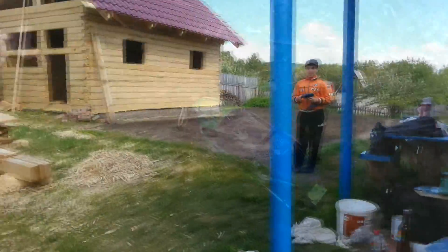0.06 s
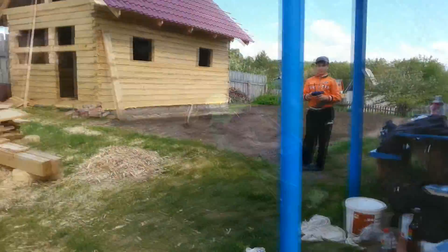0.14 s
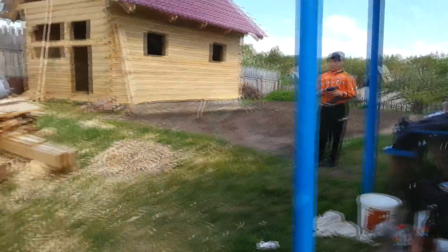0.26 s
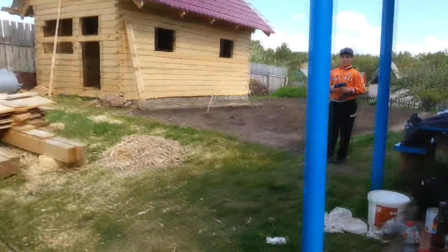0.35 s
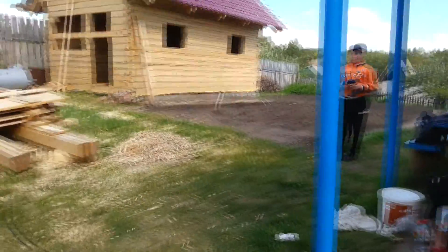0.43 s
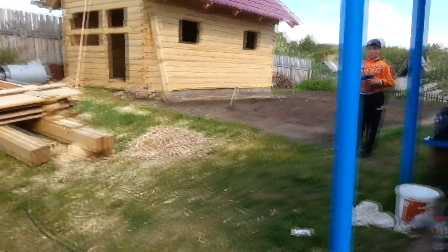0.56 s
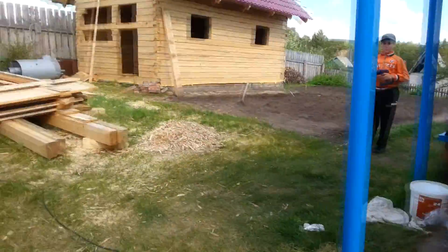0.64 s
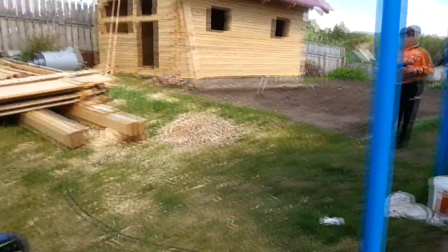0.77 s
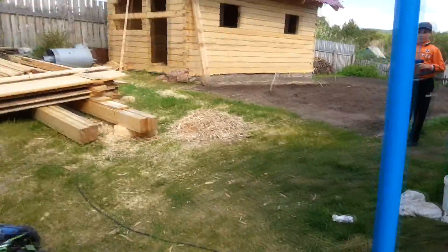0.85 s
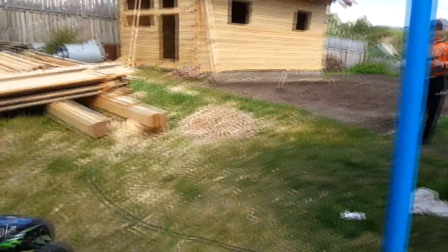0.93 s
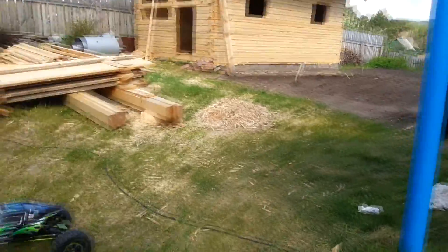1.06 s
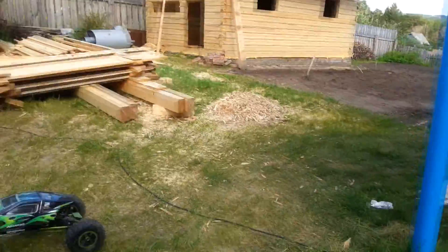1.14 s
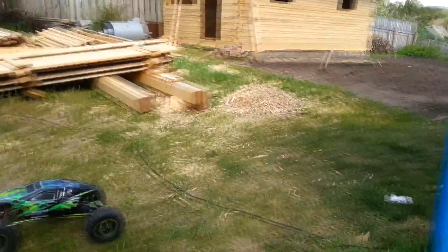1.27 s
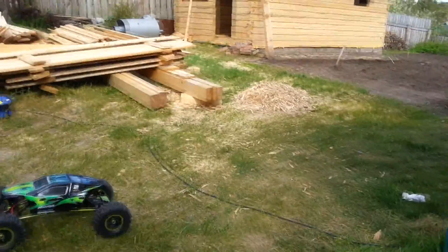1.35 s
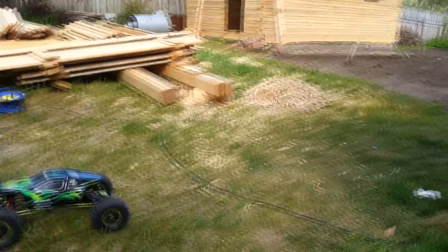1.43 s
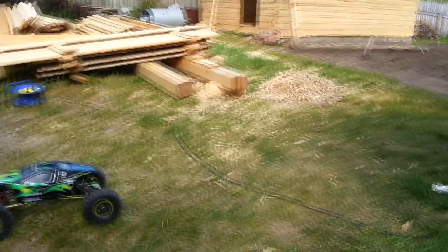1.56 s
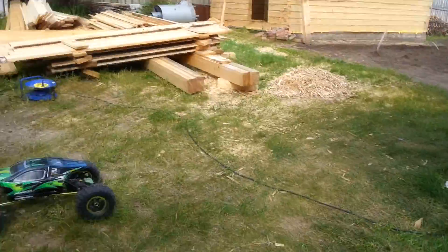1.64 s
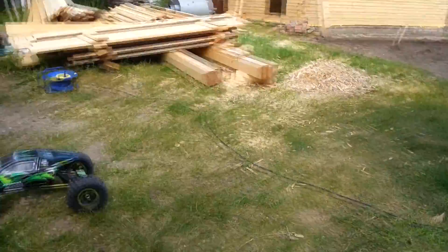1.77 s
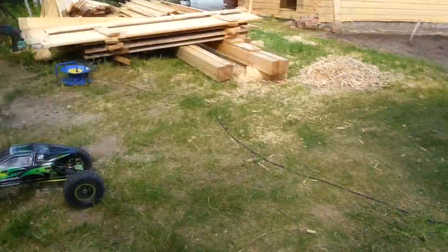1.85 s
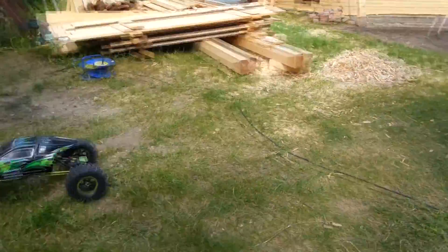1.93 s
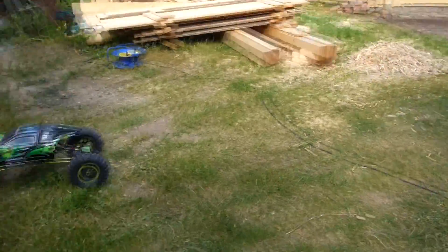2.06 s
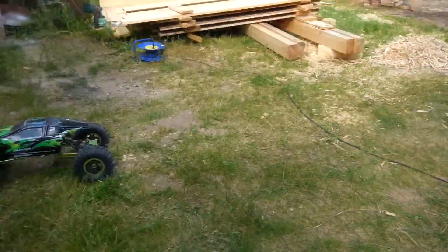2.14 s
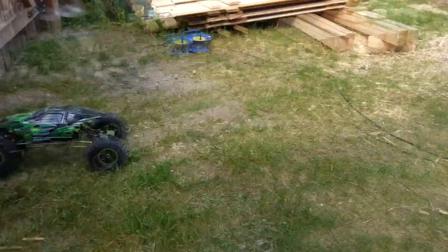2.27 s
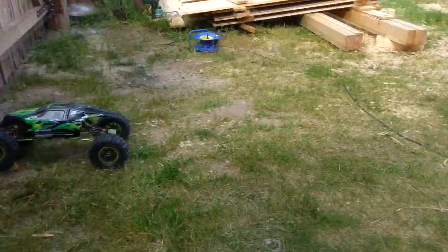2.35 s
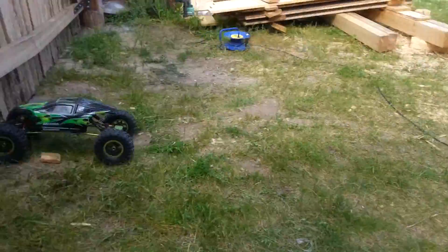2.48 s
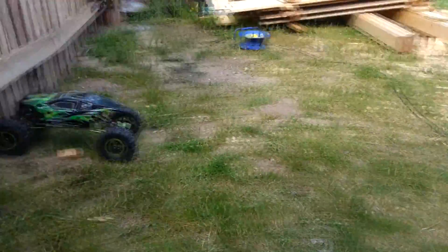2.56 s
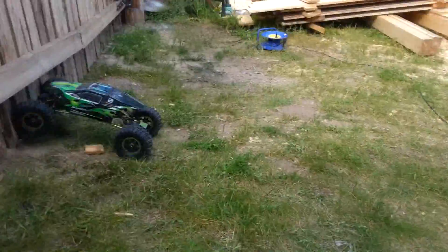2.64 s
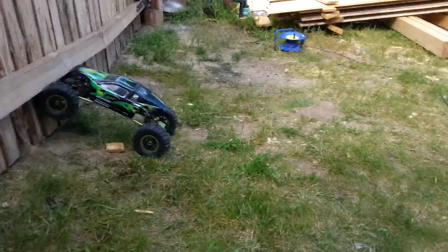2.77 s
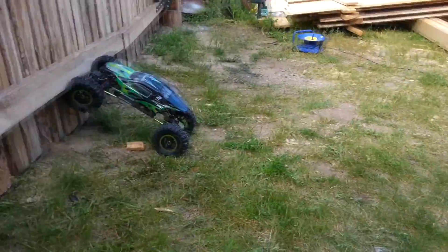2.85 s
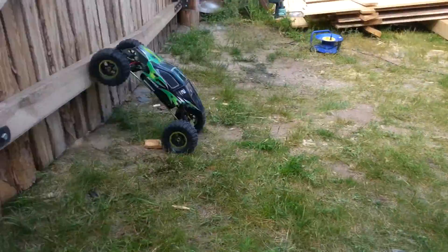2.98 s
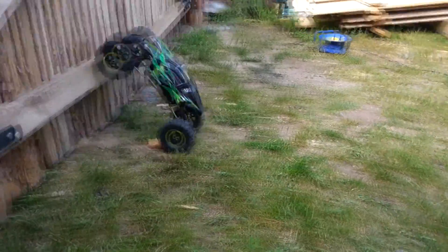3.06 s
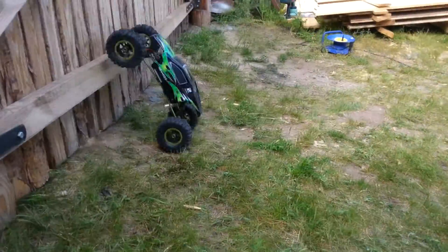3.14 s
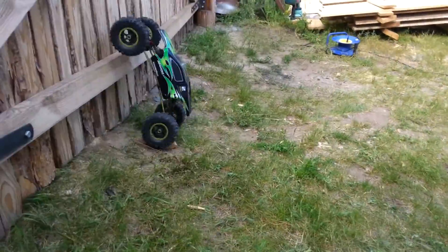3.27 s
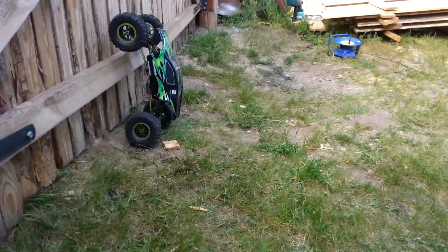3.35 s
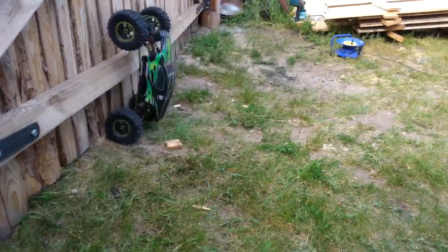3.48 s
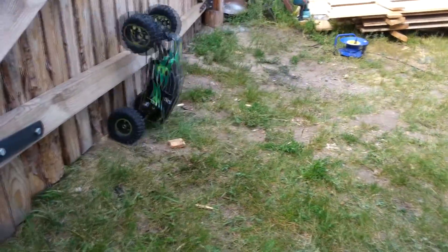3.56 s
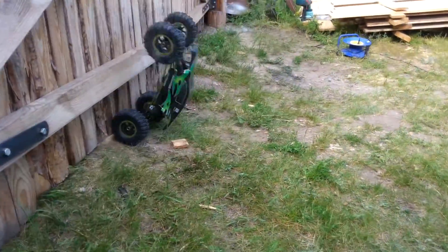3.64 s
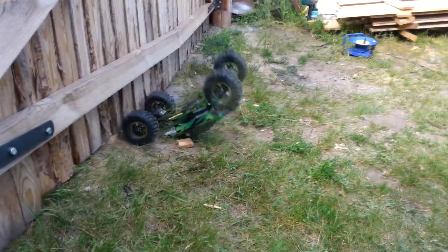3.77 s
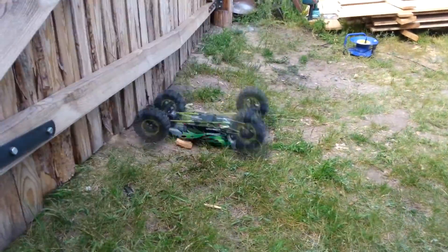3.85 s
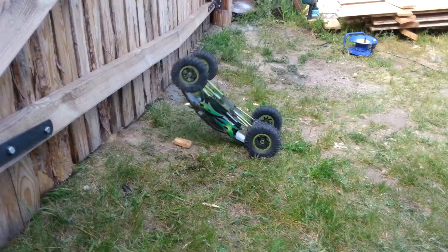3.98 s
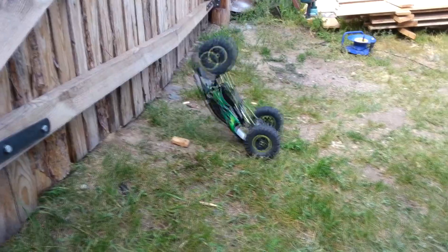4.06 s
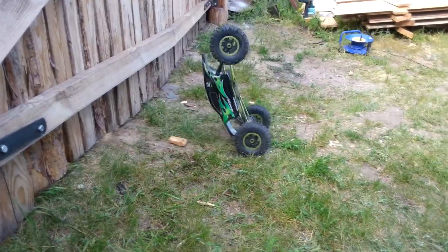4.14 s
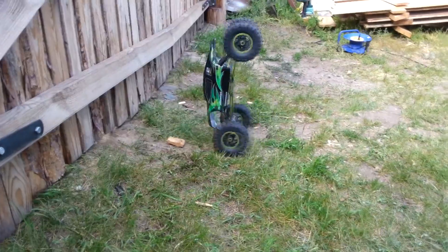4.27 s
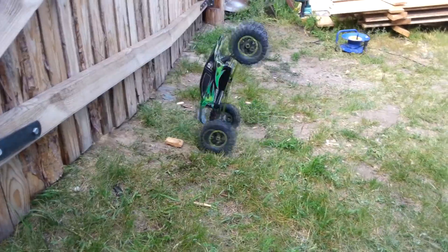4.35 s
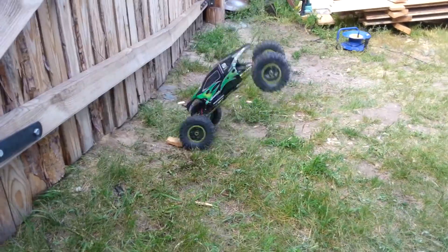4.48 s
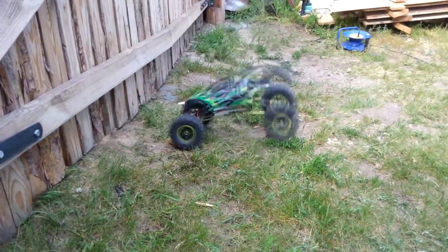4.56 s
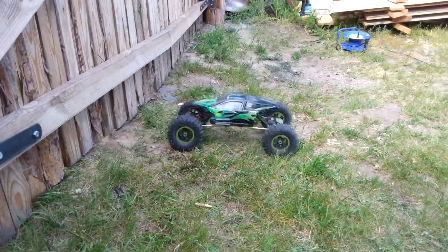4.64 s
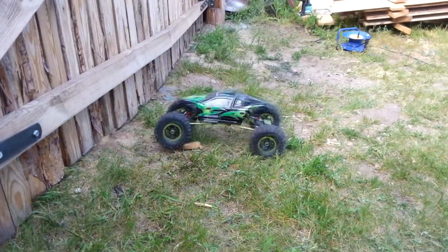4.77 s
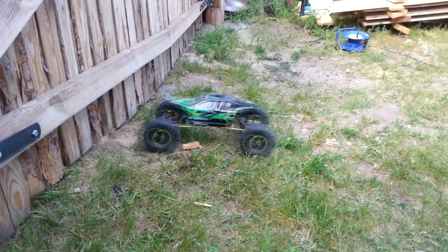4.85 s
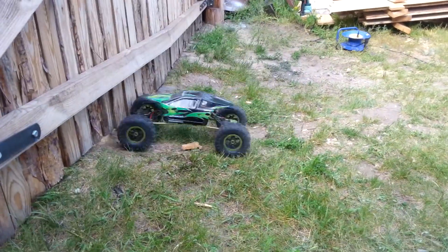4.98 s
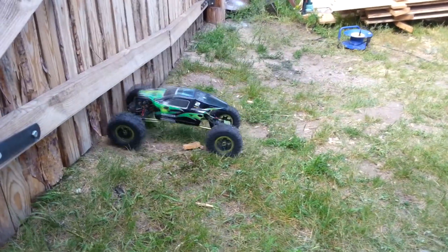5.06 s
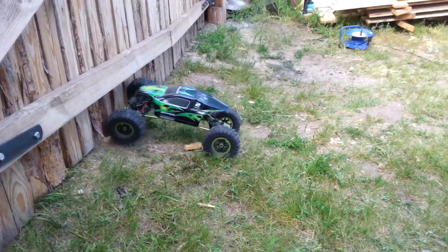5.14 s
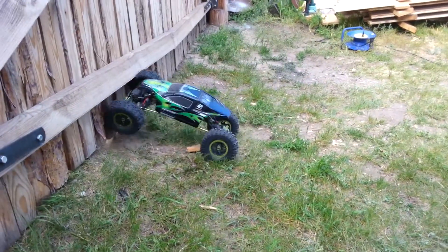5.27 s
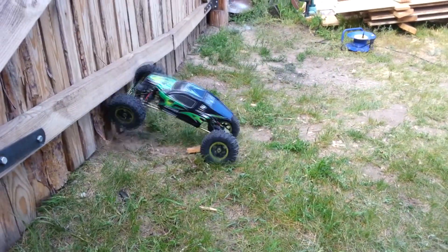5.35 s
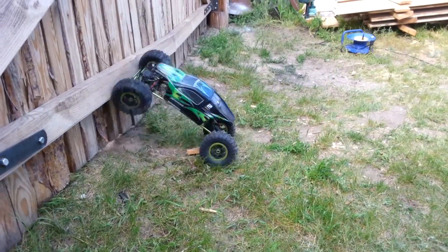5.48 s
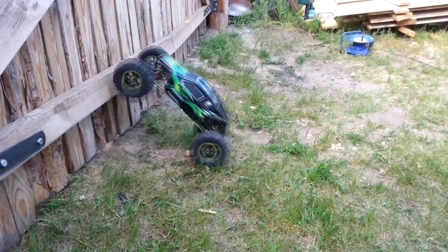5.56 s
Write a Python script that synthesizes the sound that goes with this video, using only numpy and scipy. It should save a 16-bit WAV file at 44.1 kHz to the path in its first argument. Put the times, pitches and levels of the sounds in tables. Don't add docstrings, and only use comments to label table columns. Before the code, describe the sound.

Outdoors in a quiet yard, with a soft airy hush and low wind puffs on a small handheld stereo microphone. From 0 to 0.7 s a small electric truck whines and hisses at a distance, around 2.7 kHz, fading to almost nothing. After a near-silent gap with a tiny tick, a closer, brighter gear whine swells from about 1.2 s and stays, raspy and fluttering, near 3 kHz. At 2.55 s it bumps the planks with short wooden knocks, followed by lighter taps and tyre scrabbling to 3 s. The whirr strains and throbs, with rough pulses at 3.2 to 3.8 s. Knocks cluster at 3.5 to 4 s, topped by a hard plastic snap at 3.94 s. The motor whirrs on until a heavy clattering landing at 4.65 to 4.75 s, another clack at 4.86 s, then small bumps and scuffs around 5.05 to 5.5 s, still whining at the end.

```python
import sys
import numpy as np
from scipy import signal
from scipy.fft import rfft, irfft
from scipy.io import wavfile

SR = 44100
rng = np.random.default_rng(int(sys.argv[2]) if len(sys.argv) > 2 else 0)


def voltage_ratio(level):
    return 10 ** (np.asarray(level, float) / 20)


def bounce(signal):
    frames = np.transpose(np.atleast_2d(signal))
    limited = np.clip(frames, -1, 1)
    pcm = np.round(limited * 32767).astype(np.int16)
    wavfile.write(sys.argv[1], SR, pcm)


N = 247401
T = np.arange(N) / SR
HZ = np.arange(N // 2 + 1) * SR / N + 1e-3

# frequency_hz, density_db_per_hz
YARD_SPECTRUM = [(18, -54), (30, -16.5), (203, -7), (341, -11), (430, -11), (502, -13), (572, -12),
                 (722, -10.5), (14500, -30)]
YARD_DB = -59.5

# middle_s, level_db, pitch_hz
LEFT_EDDIES = [(0.004, -29, 336), (0.029, -31.5, 248), (0.089, -28.5, 430), (0.088, -39, 650),
               (0.106, -25.5, 368), (0.171, -35, 262), (0.195, -32.5, 210), (0.373, -41.5, 140),
               (1.014, -52, 165), (1.247, -35, 119.8), (1.309, -38, 166), (1.333, -39, 146),
               (1.358, -45, 134), (1.378, -34.5, 204), (1.628, -42, 176.2), (3.618, -46, 246),
               (5.56, -31, 272.5), (5.585, -34, 202)]
RIGHT_EDDIES = [(0.133, -19.5, 298), (0.134, -29.5, 644), (0.222, -30, 510), (0.224, -36.5, 796),
                (0.227, -30.5, 217), (0.277, -25.5, 334), (0.358, -39.5, 203), (1.567, -41, 175.4),
                (1.596, -33.5, 210), (1.71, -33, 210.9), (1.878, -33.5, 178.7), (1.963, -24.5, 253),
                (2.265, -45, 173.7), (4.504, -44.5, 266), (2.76, -36, 267), (2.835, -39, 393),
                (2.946, -33, 212), (3.083, -34, 172.4), (3.15, -37, 201), (3.25, -43, 165),
                (3.316, -28, 264), (3.401, -31, 249.5), (3.448, -39, 189.7), (3.683, -25, 211),
                (4.099, -33.5, 209.3), (4.132, -39.5, 215.5), (4.868, -38, 221), (4.888, -34.5, 276),
                (5.2, -41, 141.7), (5.388, -34, 204), (5.459, -34.5, 160), (5.499, -34, 165)]
STIR_DB, STIR_FROM_S = -56.5, 1.25
LULL_S, LULL_HALF_S = 4.38, 0.198

# frequency_hz, shared_0_to_1
LIKENESS = [(250, .85), (500, .95), (1000, .8), (2000, .62), (4000, .5), (8000, .28), (12000, .2)]
# frequency_hz, left_minus_right_db
FAR_TILT = [(500, 4), (1240, -7), (2280, 1.5), (4170, 1.5), (7650, -8), (14000, -15)]
NEAR_TILT = [(300, -2.5), (600, -0.5), (1240, 4), (2280, 8.5), (4500, -1), (8000, -8), (14000, -10.5)]

# start_s, level_db, bright_part_db, length_ms
BLOWS = [(2.546, -37, -16, 4.9), (2.569, -36, -13, 11), (2.584, -26.5, -1.5, 10.8), (2.635, -45, 8, 4.6),
         (2.79, -49, 3, 6.4), (2.81, -46, -6, 24), (2.842, -30, 0, 15), (2.965, -35, -2, 12),
         (3.014, -37, -1, 33), (3.504, -32.5, -2, 23), (3.657, -23.5, -4, 10.3), (3.685, -40, 8, 14),
         (3.771, -37, -21, 17.3), (3.843, -25, -7, 7), (3.862, -22.5, -1, 8.9), (3.895, -30.5, 5, 11.5),
         (3.911, -36, -14, 10), (3.946, -28, 12.5, 7.7), (3.987, -33.5, 6, 28), (4.02, -42.5, 11, 19.8),
         (4.662, -30, -3, 23), (4.678, -23, 4.5, 18), (4.701, -19, -4, 12.2), (4.739, -40.5, 9.5, 37),
         (4.846, -34.5, 5, 11), (4.867, -33.5, -8, 19), (5.042, -37, -1, 31.8), (5.079, -37, -1, 34),
         (5.285, -41, 0, 21), (5.436, -32, 6.5, 5.1)]
# middle_s, level_db, bright_part_db, length_ms
SLIPS = [(1.36, -49.5, -6, 170), (2.6, -43, 5.5, 110), (2.7, -48, 11, 157), (2.82, -41.5, 0, 100),
         (2.99, -46, 5.5, 110), (3.58, -38, 0, 120), (3.74, -39.5, -3, 157), (3.874, -31, -1, 74),
         (4.019, -46.5, 7, 155), (4.71, -34, -15, 42), (4.82, -49.5, 9.5, 450), (5.18, -49, 6.5, 132),
         (5.3, -44, 2, 180), (5.499, -38, -0.5, 67)]
# start_s, level_db, length_ms
SNAPS = [(.874, -43.5, 3), (1.232, -54, 2.2), (2.579, -39, 3.7), (3.84, -34.5, 5.6), (3.9397, -15.5, 5.6),
         (3.96, -25.5, 10.7), (3.888, -32, 5.5), (4.652, -43, 5.4), (4.662, -37, 2.3), (4.667, -27, 5.6),
         (4.698, -36, 3.1), (4.738, -41, 7), (4.8, -49, 3), (4.832, -39, 4.8), (5.073, -37, 5.4),
         (4.687, -33, 4), (4.711, -26, 6.8), (4.862, -26, 3.4)]
# middle_s, pitch_hz, level_db, length_ms
BOARDS = [(2.568, 700, -40, 4.3), (2.585, 560, -27.5, 6.9), (2.6, 639, -39, 6.1), (2.636, 700, -40, 4),
          (2.843, 517, -36.5, 8.2), (3.505, 917, -37, 10), (3.648, 944, -37.5, 12), (3.66, 541, -27.5, 5.8),
          (3.725, 1000, -38, 6.4), (3.85, 532, -27.5, 10.4), (3.862, 1640, -29, 5.3), (3.9, 850, -36, 15),
          (3.905, 1746, -40, 14), (4.662, 556, -29, 6.4), (4.678, 862, -27.5, 12), (4.698, 541, -30, 7.1),
          (4.745, 596, -41, 8), (4.845, 846, -38, 6.4), (4.87, 590, -43, 13), (5.08, 596, -39.5, 10),
          (5.29, 850, -40, 19), (5.48, 900, -38, 16)]
# frequency_hz, width_hz, level_db
PLANK_MODES = [(128, 120, -9.5), (197.5, 63, -2), (261, 69, -2.5), (377.5, 44, -1.5), (511, 70, 2),
               (671, 57, -1.5), (843, 68, 1), (1053, 240, -1)]
SHELL_MODES = [(1390, 450, -5), (1840, 250, -1), (2300, 740, 0), (3100, 1030, 5), (3740, 1140, 3.5),
               (5200, 2300, -8), (7830, 1500, -18)]

# frequency_hz, density_db_per_hz
FAR_TONE = [(180, -15), (300, -9), (1010, -15), (1420, -16), (1670, -8), (2280, -0.5), (2680, -29),
            (5130, -22), (6330, -28.5), (10100, -28), (14500, -55)]
NEAR_TONE = [(180, 37), (300, -34.5), (500, -19), (1000, -20), (1400, -19), (1700, -15), (2600, -12.5),
             (3300, -7.5), (3750, -8), (4900, -6.5), (6400, -12.5), (10000, -16.5), (14500, -30.5)]
# frequency_hz, width_hz, level_db
FAR_CASE_MODES = [(975, 150, 17), (3460, 280, -2), (4310, 200, -8), (7000, 300, 1)]
NEAR_CASE_MODES = [(1070, 130, -0.5), (2310, 48, -13.5), (4100, 290, -7.5), (10060, 210, -9)]
# start_s, whine_hz, level_db, strain_db, upper_stage_hz
FAR_DRIVE = [
    (0, 2726, -49, 1.5, 5200),
    (.25, 2740, -51.5, 1, 5030),
    (.45, 2750, -55.5, -2.5, 4900),
    (.65, 2680, -63, -10, 4820),
    (.78, 2700, -93, -3, 4770),
]
# start_s, whine_hz, level_db, strain_db, upper_stage_hz
NEAR_DRIVE = [(.85, 2850, -78.5, -1, 4400), (1.2, 3154, -68.5, 7, 4380), (1.4, 2884, -46.5, 1.5, 4980),
              (1.52, 2783, -43, 2, 4720), (1.66, 2984, -44, -1.5, 4830), (2.5, 3137, -43, -5.5, 5075),
              (2.93, 3085, -47.5, 0.5, 5520), (3.03, 3068, -42.5, 0.5, 5200),
              (3.62, 3104, -44.5, -0.5, 5355), (3.72, 3034, -40.5, 5.5, 5310), (3.82, 3077, -43, 2.5, 5510),
              (4.02, 3097, -42, 2, 5880), (4.18, 2786, -44.5, 1.5, 5806), (4.48, 3088, -45.5, 4, 4820),
              (4.78, 3002, -42.5, -2, 5020), (5.05, 3027, -43, -1.5, 5030), (5.33, 3157, -48, -4.5, 5910),
              (5.6, 3100, -43.5, 0, 5950)]
# offset_db, strain_share_of_level, singing_over_hiss_db,
# strain_share_of_singing, extra_fade_with_distance
FAR_BANDS = [(-0.9, 0.071, -4.5, 0.68, .01), (-2, 0.18, -5, 2.2, .01), (0.1, 0.16, -6, .3, .01),
             (-6, 0.6, -60, .1, .01)]
NEAR_BANDS = [(-3, 0.11, -12.5, 0.42, -0.16), (-1.23, 0.84, -2, 1.7, -0.021),
              (0.07, -0.013, -9.5, -0.74, .05), (-8, 0.13, -60, .1, 0.26)]
BAND_TOPS_HZ = [2400, 3600, 6000]
# start_s, throb_0_to_1, left_minus_right_db
LOAD = [
    (0, 0.1, 3.5),
    (1.5, 0.23, -0.3),
    (2.2, 0.18, -1.5),
    (2.8, 0.33, -0.5),
    (3.6, 0.15, 0.5),
    (4.3, 0.29, 2),
    (4.7, 0.21, -0.3),
    (5.61, 0.35, 1.5),
]
# start_s, level_db
SLAMS = [
    (3.219, 13),
    (3.381, 13),
    (3.459, 13),
    (3.699, 11.5),
    (3.736, -1),
    (3.779, 3.5),
    (4.221, 6),
    (4.447, 6),
    (4.481, 8),
]
# middle_s, pitch_hz, level_db, length_ms
FAR_SPELLS = [
    (.04, 2700, -65, 32),
    (.1, 1690, -58, 120),
    (.28, 1690, -59, 56),
    (.24, 4230, -56, 50),
    (.28, 2720, -52, 40),
    (.5, 1720, -66, 50),
]
NEAR_SPELLS = [(1.24, 4250, -64, 16), (1.359, 2700, -55, 67), (1.44, 3200, -47, 40), (1.54, 2770, -46, 67),
               (1.56, 4000, -48, 41), (1.63, 4900, -50, 68), (1.76, 4310, -47.5, 100),
               (1.87, 2950, -43, 49), (2.06, 3050, -48, 51), (2.18, 2980, -46.5, 70), (2.08, 4200, -49, 67),
               (2.13, 4650, -46, 28), (2.32, 5100, -49, 52), (2.42, 3200, -49.5, 65), (2.46, 5000, -49, 50),
               (2.665, 2200, -42, 12), (2.675, 4000, -44, 6), (2.74, 3500, -49, 42), (3.02, 3080, -46, 21),
               (3.11, 3480, -49, 30), (3.16, 1760, -47.5, 69), (3.2, 2390, -49, 50),
               (3.16, 3040, -45.5, 35), (3.25, 3165, -42.5, 33), (3.29, 1837, -48, 44),
               (3.41, 1625, -45, 32), (3.44, 3065, -49, 27), (4.07, 5950, -46, 40), (4.11, 3450, -49, 28),
               (4.225, 2754, -45.5, 55), (4.222, 3530, -43, 12), (4.34, 2930, -48, 84),
               (4.35, 1800, -51.5, 75), (4.42, 2985, -50, 50), (4.54, 2347, -47, 40), (4.57, 3080, -53, 45),
               (4.672, 2310, -33, 14), (4.677, 3978, -34.5, 10), (4.839, 3150, -38.5, 17),
               (4.95, 3800, -45.5, 30), (4.97, 4600, -47, 50), (5.04, 3020, -46, 55),
               (5.075, 3600, -41, 18.6), (5.26, 3210, -50, 25), (5.305, 2420, -48, 25),
               (5.46, 2580, -46, 41.4), (5.55, 3415, -51, 28)]
PINION_TEETH = 9
CLOSE_DB = -45
CLIMB_S, CLIMB_LENGTH_S, CLIMB_DB = 2.9, 0.53, 6
CASE_WANDER, WHINE_WAVER = 0.04, 0.012
IDLER_SHARE, IDLER_DB = 0.845, -6


def rms_one(x):
    return x / np.sqrt(np.mean(x ** 2) + 1e-20)


def in_time(rows):
    s, *columns = np.transpose(rows)
    return [np.interp(T, s, column) for column in columns]


def at_hz(points, hz):
    points_hz, values = np.transpose(points)
    return np.interp(np.log(hz), np.log(points_hz), values)


def drift(rate_hz):
    hop, settle = 40, 2000
    r = np.exp(-2 * np.pi * rate_hz * hop / SR)
    chance = rng.standard_normal(N // hop + settle + 2)
    slow = rms_one(signal.lfilter([1], [1, -2 * r, r * r], chance)[settle:])
    return np.interp(np.arange(N) / hop, np.arange(len(slow)), slow)


def resonate(x, modes):
    out = 0
    for k, (hz, width_hz, db) in enumerate(modes):
        r = np.exp(-np.pi * width_hz / SR)
        b = (1 - r * r) / 2 * np.array([1, 0, -1])
        a = [1, -2 * r * np.cos(2 * np.pi * hz / SR), r * r]
        ring = signal.lfilter(b, a, x + 1e-18) / np.sqrt(width_hz / SR)
        out = out + (-1) ** k * voltage_ratio(db) * ring
    return out


def clatter(per_s, spread_db):
    sizes = voltage_ratio(spread_db * np.minimum(rng.exponential(1, (3, N)), 4))
    sizes = sizes * rng.choice([-1, 1], (3, N))
    return rms_one(sizes * (rng.random((3, N)) < per_s / SR))


def bursts(times, levels_db, lengths_ms, lean):
    out = np.zeros(N)
    for s, db, ms in zip(times, levels_db, lengths_ms):
        near = slice(int((s - .3) * SR), int((s + .4) * SR))
        age = (T[near] - s) * 1000 / max(ms, .5)
        age = age * np.where(age < 0, lean, 1)
        out[near] += voltage_ratio(db) * np.exp(-2 * age ** 2)
    return out


def spells(rows, gate, turns, slip_rad):
    phase = np.cumsum(slip_rad * rng.standard_normal((3, int(turns[-1]) + 2)), axis=1)
    slips = np.array([np.interp(turns, np.arange(len(row)), row) for row in phase])
    out = np.zeros((3, N))
    for s, hz, db, ms in rows:
        near = slice(max(int((s - .25) * SR), 0), int((s + .25) * SR))
        swell = voltage_ratio(db) * np.exp(-((T[near] - s) * 1000 / ms) ** 2)
        out[:, near] += swell * np.cos(2 * np.pi * hz * T[near] + slips[:, near])
    return np.sqrt(2) * gate * out


def ports(three, tilt, lag_ms, likeness):
    shared, left, right = rfft(three)
    alike = np.clip(likeness * at_hz(LIKENESS, HZ), 0, 1)
    late = np.exp(-2j * np.pi * HZ * lag_ms / 1000)
    common = np.sqrt(alike) * shared * [late, np.ones_like(late)]
    pair = common + np.sqrt(1 - alike) * np.array([left, right])
    return irfft(pair * voltage_ratio(at_hz(tilt, HZ) / 2 * np.array([[1], [-1]])), N)


def yard():
    spectrum = rfft(rng.standard_normal((2, N))) * voltage_ratio(at_hz(YARD_SPECTRUM, HZ))
    return voltage_ratio(YARD_DB + 2.5) * rms_one(irfft(spectrum, N))


def breeze(eddies, lee_db, cycles, wake_db):
    out, wake = np.zeros(N), np.zeros(N)
    for (s, db, hz), phase in zip(eddies, rng.uniform(0, 2 * np.pi, len(eddies))):
        near = slice(max(int((s - .15) * SR), 0), int((s + .15) * SR))
        spin = (T[near] - s) * hz
        steep = 0.23 * np.cos(4.6 * np.pi * spin + 2 * phase) * np.exp(-spin ** 2 * 3.0)
        push = np.cos(2 * np.pi * spin + phase) + steep
        out[near] += voltage_ratio(db + 7) * np.exp(-(spin / cycles) ** 2) * push
        wake[near] += voltage_ratio(db + wake_db) * np.exp(-np.abs(T[near] - s) / .04)
    stirring = (T > STIR_FROM_S) * (np.abs(T - LULL_S) > LULL_HALF_S)
    wake += voltage_ratio(STIR_DB + lee_db + 6.0 * drift(5.1)) * stirring
    tumble_band = signal.butter(1, [85, 260], "band", fs=SR, output="sos")
    tumble = signal.sosfilt(tumble_band, clatter(250, spread_db=3.5)[0])
    high_pass = signal.butter(1, 120, "high", fs=SR, output="sos")
    return signal.sosfilt(high_pass, out) + wake * rms_one(tumble)


def fence():
    s, db, bright_db, ms = np.transpose(BLOWS)
    slip_s, slip_db, slip_bright_db, slip_ms = np.transpose(SLIPS)
    judder = voltage_ratio(-2.0 + 1.7 * np.clip(drift(56), -2, 2))
    wood = bursts(s - .005, db - 4.0, 1.16 * ms, lean=2.34)
    wood = wood + judder * bursts(slip_s, slip_db, slip_ms, lean=0.98)
    plastic = bursts(s - .004, db + bright_db - 6.5, 1.66 * ms, lean=4.0)
    plastic = plastic + judder * bursts(slip_s, slip_db + slip_bright_db, slip_ms, lean=1.06)
    snaps = bursts(*np.transpose(SNAPS), lean=49.0)
    planks = resonate(clatter(6000, spread_db=2.5) * (wood + voltage_ratio(-8.5) * snaps), PLANK_MODES)
    shell = resonate(clatter(4000, spread_db=0.5) * (plastic + voltage_ratio(0.5) * snaps), SHELL_MODES)
    crack = np.diff(clatter(9000, spread_db=-2.0) * snaps, prepend=0)
    boards = spells(BOARDS, 0.87, 60 * T, slip_rad=.5)
    return boards + voltage_ratio(-12.0) * planks + voltage_ratio(-9) * shell + voltage_ratio(-37) * crack


def sing(gate, turns, centre_hz, width_hz, clear):
    hop = 16
    spin = np.exp(1j * rng.uniform(0, 2 * np.pi, (3, int(turns[-1]) + 1)))[:, turns.astype(int)]
    ping = signal.lfilter(*signal.butter(1, 400, fs=SR), gate * spin)
    shape = (3, N // hop + 1)
    noise = rng.standard_normal(shape) + 1j * rng.standard_normal(shape)
    slow = signal.lfilter(*signal.butter(2, width_hz / 2, fs=SR / hop), noise)
    blur = np.array([np.interp(np.arange(N) / hop, np.arange(len(row)), row) for row in slow])
    carrier = np.exp(2j * np.pi * np.cumsum(centre_hz) / SR)
    pinging = rms_one(np.real(ping * carrier))
    blurred = rms_one(gate * np.real(blur * carrier))
    return rms_one(clear * pinging + (1 - clear) * blurred)


def gear_hiss(gate, tone, modes, patchy_db):
    peaks = 1 + sum(voltage_ratio(db) ** 2 * 4 / (1 + (2 * (HZ - hz) / width_hz) ** 2) for hz, width_hz, db in modes)
    hiss = rfft(gate * rng.standard_normal((3, N))) * voltage_ratio(at_hz(tone, HZ)) * np.sqrt(peaks)
    bands = np.zeros((4, 3, N))
    for k in range(18):
        octaves = np.log2(HZ / 290) - k / 3
        share = np.cos(np.clip(octaves * 3, -1, 1) * np.pi / 2) ** 2
        flicker = voltage_ratio(patchy_db * (drift(4.5) + drift(37)))
        band = np.searchsorted(BAND_TOPS_HZ, 290 * 2 ** (k / 3))
        bands[band] += flicker * irfft(hiss * share, N)
    return bands


def gears(rows, bands, whine_per_turn, case_hz, width_hz, tone, modes, rung, throb, mesh_db, patchy_db, is_near):
    whine_hz, level_db, strain_db, high_hz = in_time(rows)
    fade_db = np.minimum(level_db - CLOSE_DB, 0)
    band_db = [level_db + db + share * strain_db + dull * fade_db for db, share, _, _, dull in bands]
    low_db, whine_db, high_db, top_db = [db + share * strain_db for _, _, db, share, _ in bands]
    low_db = low_db + CLIMB_DB * np.exp(-((T - CLIMB_S) / CLIMB_LENGTH_S) ** 4)

    turns_per_s = whine_hz / whine_per_turn
    turns = np.cumsum(turns_per_s * (1 + 0.00814 * drift(8.6))) / SR
    low_hz = case_hz * (1 + CASE_WANDER * is_near * drift(1.5))
    bite = voltage_ratio(1.6 * np.clip(rng.standard_normal(int(turns[-1]) + 1), -2, 2))[turns.astype(int)]
    bunch = rms_one(bite * np.exp(-1.6 * np.cos(2 * np.pi * turns)))
    throb = np.clip(throb, 0, 1)
    gate = 1 - throb + throb * bunch
    hard = np.clip(throb + 0.33, 0, 1)
    hard_gate = 1 - hard + hard * bunch
    slam_s, slam_db = np.transpose(SLAMS)
    pulse = hard_gate + bursts(slam_s, slam_db, 5.6 + 0 * slam_s, lean=1.41)

    hisses = gear_hiss(gate, tone, modes, patchy_db)
    mesh = (throb / 0.41) ** 2 * voltage_ratio(mesh_db + 1.7 * drift(10.0)) * np.sin(2 * np.pi * PINION_TEETH * turns)
    low = voltage_ratio(low_db + 2.5 * drift(12)) * sing(pulse, turns, low_hz, width_hz, clear=.2)
    wavering_hz = whine_hz * (1 + WHINE_WAVER * drift(5.0))
    whine = voltage_ratio(whine_db) * sing(pulse, turns, wavering_hz, 1.6 * width_hz, clear=0.55)
    upper = sing(gate, turns, high_hz, 1.7 * width_hz, clear=0.076)
    idler = sing(gate, turns, IDLER_SHARE * high_hz, 1.7 * width_hz, clear=0.07)
    high = voltage_ratio(high_db) * (upper + voltage_ratio(IDLER_DB) * idler)

    out = 0
    tunes = [mesh + low, whine, high, 0]
    tunes_db = [low_db, whine_db, high_db, top_db]
    for db, hiss, tune, tune_db in zip(band_db, hisses, tunes, tunes_db):
        out = out + voltage_ratio(db) * (rms_one(hiss) + tune) / np.sqrt(1 + voltage_ratio(tune_db) ** 2)
    out = out + spells(rung, 0.24 * gate + 0.71 * hard_gate, turns, slip_rad=0.901)
    heard = np.interp(T, [.77, .93], [0, 1])
    return out * (heard if is_near else 1 - heard)


def scene():
    left_wind = breeze(LEFT_EDDIES, lee_db=-3, cycles=.85, wake_db=-15)
    right_wind = breeze(RIGHT_EDDIES, lee_db=2, cycles=.85, wake_db=-15)
    knocks = voltage_ratio(0.5) * ports(fence(), NEAR_TILT, lag_ms=0.17, likeness=1.17)
    throb, pan_db = in_time(LOAD)
    pan = voltage_ratio(np.array([[.5], [-.5]]) * pan_db)
    far = gears(FAR_DRIVE, FAR_BANDS, whine_per_turn=40.5, case_hz=1720, width_hz=120, tone=FAR_TONE,
                modes=FAR_CASE_MODES, rung=FAR_SPELLS, throb=throb, mesh_db=-28, patchy_db=1.8, is_near=False)
    near = gears(NEAR_DRIVE, NEAR_BANDS, whine_per_turn=36, case_hz=1802, width_hz=220, tone=NEAR_TONE,
                 modes=NEAR_CASE_MODES, rung=NEAR_SPELLS, throb=throb, mesh_db=-8.5, patchy_db=1.61, is_near=True)
    far = voltage_ratio(1.5) * ports(far, FAR_TILT, lag_ms=0.048, likeness=0.98)
    near = voltage_ratio(2.5) * ports(near, NEAR_TILT, lag_ms=0.29, likeness=0.69)
    return pan * (far + near) + knocks + np.array([left_wind, right_wind]) + yard()


def roll_off(x):
    return signal.sosfilt(signal.butter(12, 14420, fs=SR, output="sos"), x)


def record(dry):
    x = signal.sosfilt(signal.butter(1, 40, "high", fs=SR, output="sos"), dry)
    x = .55 * np.tanh(x / .55)
    mix = signal.sosfilt(signal.cheby2(14, 60, 15000, fs=SR, output="sos"), x)
    return roll_off(mix)


dry = scene()
out = record(dry)
bounce(out)
```